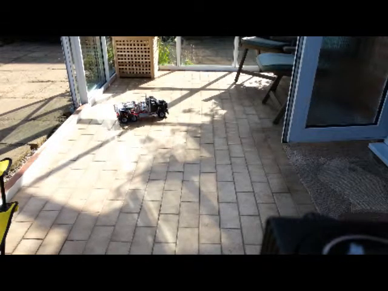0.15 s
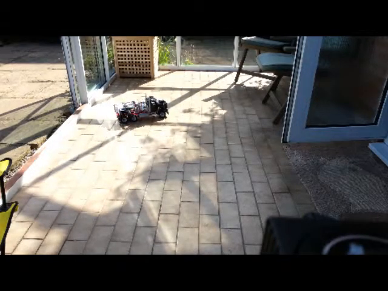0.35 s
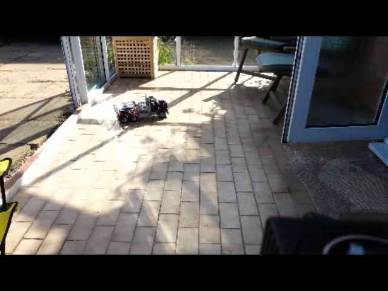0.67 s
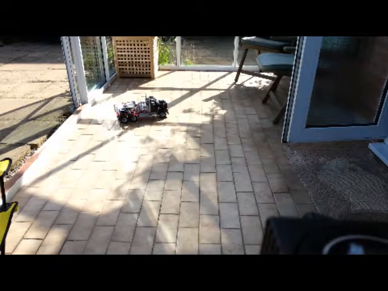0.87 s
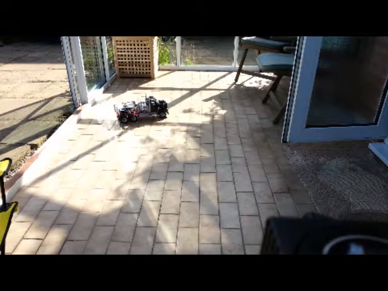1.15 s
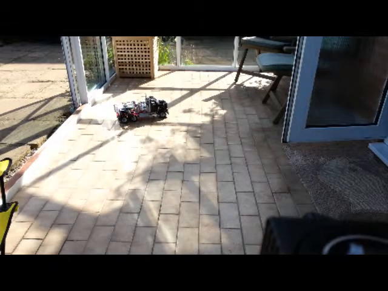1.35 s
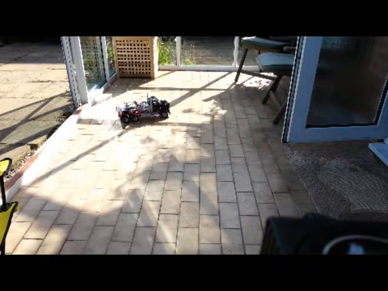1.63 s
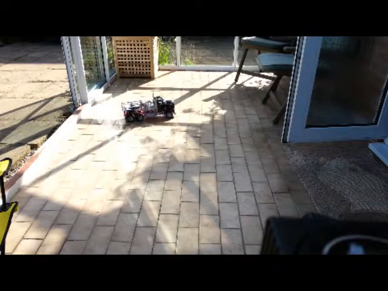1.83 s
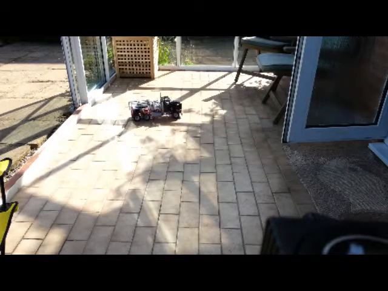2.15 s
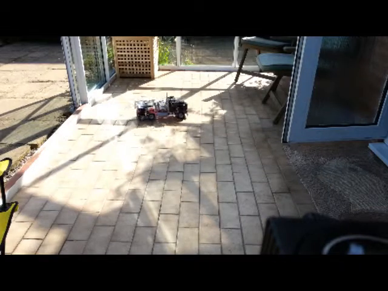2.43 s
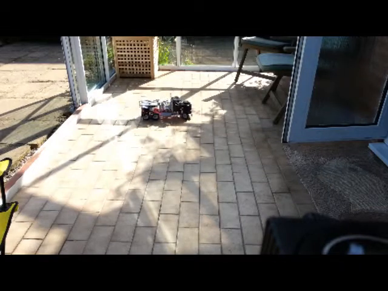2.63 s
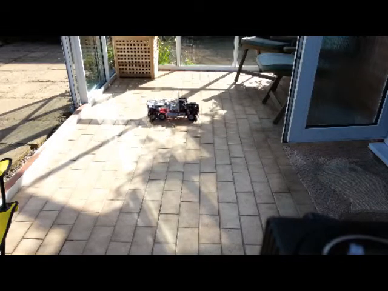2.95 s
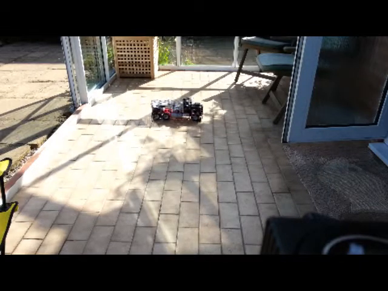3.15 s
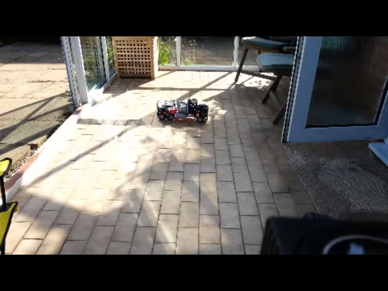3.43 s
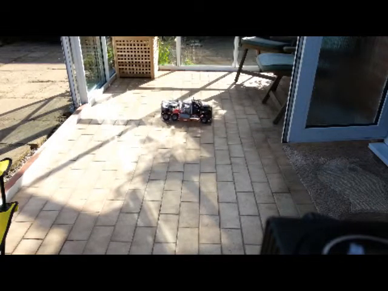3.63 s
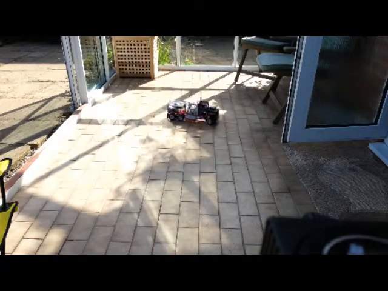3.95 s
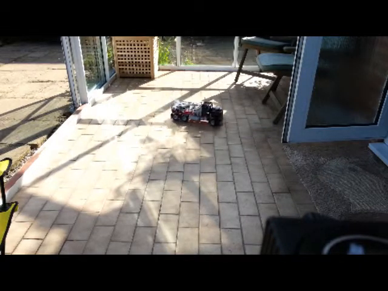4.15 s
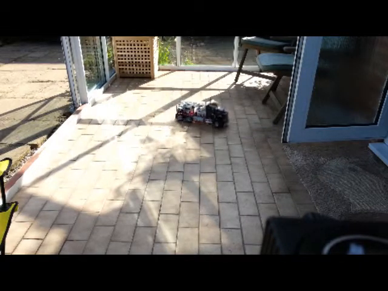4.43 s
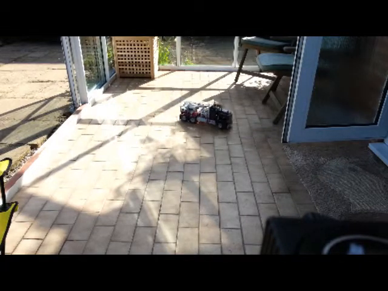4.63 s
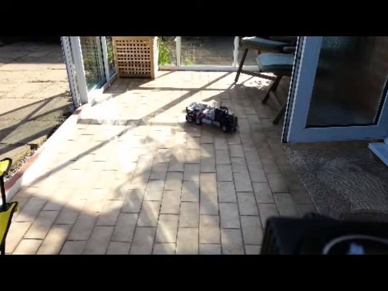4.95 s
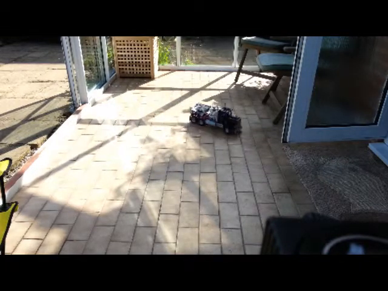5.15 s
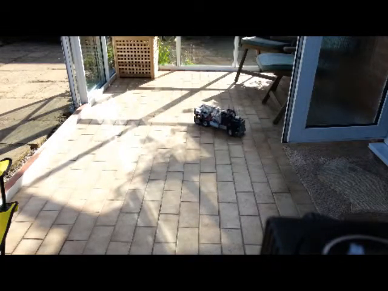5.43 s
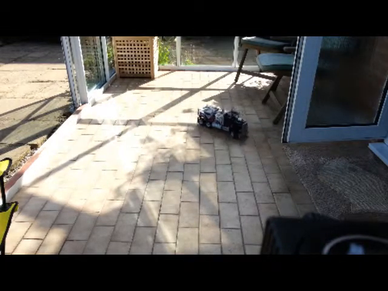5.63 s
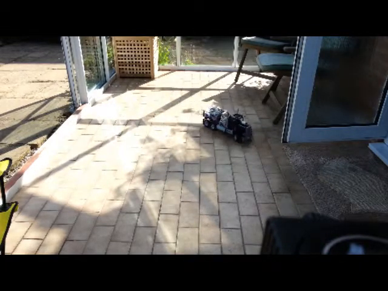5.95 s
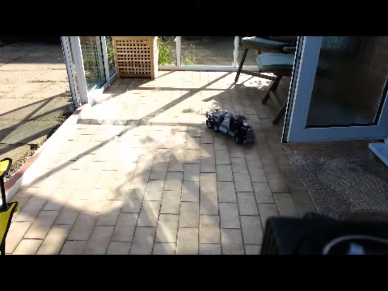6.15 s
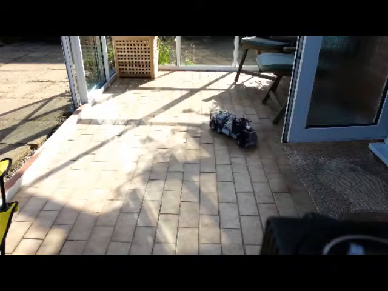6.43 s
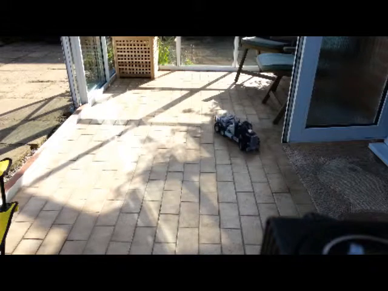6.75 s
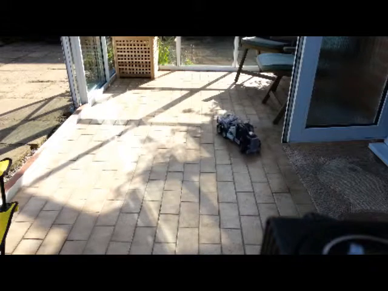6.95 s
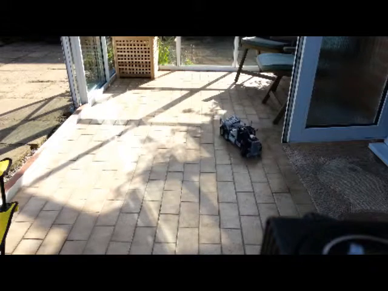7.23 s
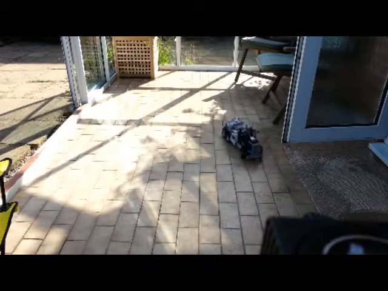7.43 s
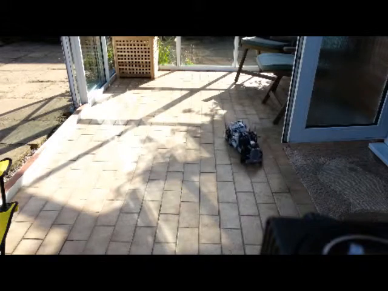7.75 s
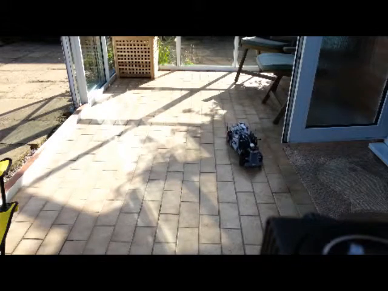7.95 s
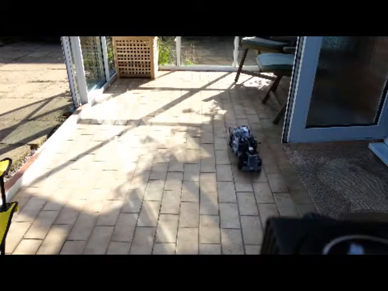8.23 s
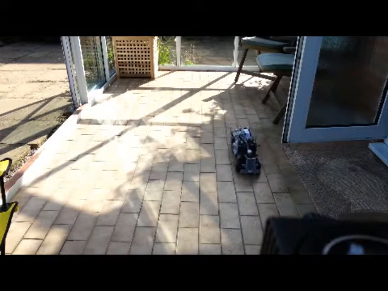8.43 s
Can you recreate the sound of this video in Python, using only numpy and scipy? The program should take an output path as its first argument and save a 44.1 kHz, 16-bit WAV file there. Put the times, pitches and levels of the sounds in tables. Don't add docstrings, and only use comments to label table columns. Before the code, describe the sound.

In a tiled glass porch with open doors, a toy truck's gears stop, leaving birds and wind bumping the microphone. Just after one second its little motor rattles up to speed and runs to the end, a buzzy whine over sizzling plastic gear noise, wavering as wheels cross the joints and strongest late on. Sparrows chirp with short echoes, a far dove is barely audible, and late gusts thump mainly on the right.

```python
import sys
import numpy as np
from scipy import signal
from scipy.fft import irfft
from scipy.io import wavfile

SR = 44100
rng = np.random.default_rng(int(sys.argv[2]) if len(sys.argv) > 2 else 0)


def voltage_ratio(decibels):
    exponent = np.asarray(decibels, float) / 20
    return 10 ** exponent


def output_pcm(signal):
    pcm = np.clip(np.atleast_2d(signal).T, -1, 1) * 32767
    wavfile.write(sys.argv[1], SR, np.round(pcm).astype(np.int16))


N = 378378

# time in seconds, tooth mesh in Hz, main whine in dB, tooth load in dB.
DRIVE = [(1.24, 424.6, -83, -15.5), (1.34, 516, -46, 5), (1.44, 503.3, -44, -3.5), (1.52, 472.8, -48, 3),
         (1.63, 593.7, -40.5, -2.5), (1.77, 650, -64, 7), (1.8, 629.7, -41.5, 3), (4.2, 674.3, -46.5, 4),
         (5.0, 654, -39, 3), (5.8, 627, -43.5, 4.5), (6.6, 643.1, -39, 2), (7.1, 623.8, -42.5, 2),
         (7.9, 623.8, -36.5, 2), (8.08, 619.9, -32.5, -1), (8.2, 626.8, -34, 2.5), (8.58, 625.4, -38, 3.5)]
# middle in seconds, length in seconds, speed lost in %, whine gained in dB.
TILE_JOINTS = [(1.928, 0.31, 6.6, 0.5), (2.284, 0.29, 3.56, 7), (2.753, 0.58, 3.76, 0),
               (3.261, 0.73, 6.14, 2.5), (3.797, 0.71, 9.14, 7.5), (4.305, 0.84, 9.55, 2.5),
               (4.802, 0.43, 6.74, 0), (5.287, 0.56, 8.9, 1.5), (6.351, 0.65, 8.06, 4.5),
               (6.819, 0.49, 4.9, 3.5), (7.196, 0.55, 4.97, 6.5), (7.435, 0.39, 2.42, 0.5),
               (7.745, 0.52, 3.14, 3.5), (8.345, 0.64, 2.6, 3)]
# time in seconds, level in dB.
HISS = [(0.0, -45), (0.13, -54), (0.17, -59), (0.4, -73.5), (1.15, -70.5), (1.24, -59), (1.29, -46.5),
        (1.38, -46), (1.48, -54), (1.6, -40.5), (1.72, -42.5), (2.05, -40), (6.14, -41), (8.58, -41.5)]
# frequency in Hz, density in dB per Hz.
HISS_COLOUR = [(150, -48.5), (250, -10), (501, -11), (1230, -10.5), (1360, -10.5), (1850, -3),
               (2190, -35.5), (2510, -10), (3470, -4.5), (4400, -2), (7690, -11), (10600, -8.5),
               (12000, -14), (13000, -38), (14400, -84)]
# frequency in Hz, width in Hz, level in dB.
CHASSIS = [
    (2610, 690, 5.5),
    (3900, 250, -15),
    (4070, 370, -15),
    (10460, 1300, 8),
]
# multiple of the shaft speed, level in dB rms.
ORDER_LEVELS = [(10, -68.5), (17, -63.5), (20, -53.5), (27, -55), (29, -60), (30, -37.4), (31, -50.5),
                (33, -60), (37, -63.5), (38, -58), (41, -60), (40, -50.5), (42, -57), (43, -48), (44, -79),
                (47, -53), (49, -54.5), (50, -44.5), (52, -49), (53, -69), (54, -55), (60, -44.5),
                (62, -50), (69, -49), (70, -42.5), (72, -53), (74, -50.5), (78, -64), (79, -45.5),
                (90, -55.5)]
# time in seconds, delay of the left port in ms.
LEFT_LAG = [
    (0, 0.43),
    (4, 0.39),
    (6, -0.065),
    (8.58, -0.03),
]
# frequency in Hz, density in dB per Hz.
GARDEN = [(24, -33), (40, -4), (180, -5), (616, -8.5), (807, -11.5), (869, 1), (1650, -24), (3130, -23.5),
          (6550, -18), (9000, -18.5), (12700, -16), (14400, -21.5)]
# frequency in Hz, left-right likeness from 0 to 1.
LIKENESS = [(300, 0.31), (1500, 0.11), (4000, 0.25), (12000, 0.087)]
# frequency in Hz, left over right in dB.
LEAN = [(60, -4.5), (180, 1.5), (530, -0.5), (1580, 0.5), (4690, -5.5), (14000, 1)]
# time in seconds, level in dB.
BREEZE = [(0, -57), (1.1, -56), (1.5, -62), (3.0, -60.5), (3.3, -73.5), (5.2, -78), (5.6, -64),
          (7.3, -62.5), (8.58, -63.5)]
# middle in seconds, length in seconds, level in dB, left over right in dB.
GUSTS = [(0.136, 0.09, -38, 25), (0.209, 0.11, -28, 0.5), (.31, 0.1, -38.5, 4), (0.381, 0.092, -38.5, -12),
         (0.608, 0.2, -53, 20), (0.787, 0.21, -44, -3), (0.84, 0.23, -38.5, 23), (1.728, 0.32, -51.5, 16),
         (2.04, 0.32, -49, 1), (2.27, 0.33, -45.5, 6.5), (2.639, 0.066, -50, -4), (2.86, 0.28, -49, 6),
         (3.9, .1, -48.5, 12), (4.04, 0.12, -62, 22), (4.253, .08, -57, 12), (7.47, .1, -59, -16),
         (7.634, 0.1396, -46.5, 4), (7.739, 0.12, -39.5, -30), (7.813, 0.065, -42.5, -42),
         (7.89, 0.11, -41, 0), (8.006, 0.25, -43, -20), (8.097, 0.12, -32.5, -25.5), (8.181, 0.17, -37, -1),
         (8.401, 0.19, -62.5, 22.5)]
# start in seconds, length in seconds, top in Hz, fall after the top in Hz, level in dB.
CHIRPS = [(0.061, 0.055, 4140, 595, -28.5), (0.102, 0.076, 3100, 320, -34), (0.632, 0.04, 5410, 400, -46),
          (0.644, 0.12, 4550, 1860, -32), (0.825, 0.052, 5460, 910, -46), (0.827, .04, 2800, 463, -39.5),
          (0.853, 0.14, 3900, 1432, -40.5), (1.173, 0.13, 5075, 2606, -35), (1.223, 0.035, 6620, 40, -43),
          (1.228, .04, 6080, 40, -41), (1.392, 0.09, 4340, 1104, -34.5), (2.167, 0.09, 4330, 1150, -35),
          (2.696, 0.11, 4420, 1240, -36), (4.025, 0.086, 4260, 1150, -31.5),
          (4.761, 0.081, 4356, 1100, -33), (5.393, 0.12, 4370, 1500, -39), (5.787, 0.057, 6054, 60, -34),
          (6.148, 0.099, 4532, 1258, -43), (6.966, 0.11, 4803, 1592, -30), (7.729, 0.048, 6065, 442.7, -35),
          (7.789, 0.078, 4166, 1274, -30), (8.207, 0.054, 6100, 145.4, -37)]
# start in seconds, length in seconds, start in Hz, end in Hz, level in dB.
COOS = [
    (3.92, 0.28, 824, 791, -53.5),
    (5.62, 0.34, 557, 452.2, -59),
    (6.36, 0.287, 828.4, 775, -55),
    (7.18, .25, 488.3, 431, -66.5),
]

TEETH, MAIN_ORDER = 10, 30
START_S, SETTLED_S = 1.24, 1.76
TRUCK_T60_S, PORCH_T60_S = 0.33, 0.42
SIDES = np.array([[.5], [-.5]])
SLOW = 40


def rms_one(x):
    return x / np.sqrt(np.mean(x ** 2) + 1e-20)


def in_time(rows):
    s, *columns = np.transpose(rows)
    return [np.interp(np.arange(N) / SR, s, c) for c in columns]


def at_hz(points, hz):
    table_hz, value = np.array(points).T
    return np.interp(np.log(hz), np.log(table_hz), value)


def fill_in(slow):
    return np.interp(np.arange(N) / SLOW, np.arange(len(slow)), slow)


def drift(rate_hz):
    r = np.exp(-2 * np.pi * SLOW * rate_hz / SR)
    white = rng.standard_normal(N // SLOW + 2002)
    slow = signal.lfilter([1], [1, -2 * r, r * r], white)[2000:]
    return fill_in(rms_one(slow))


def humps(rows):
    t = np.arange(0, N, SLOW) / SR
    middle, length = np.transpose(rows)[:2, :, None]
    return np.cos(np.pi * np.clip((t - middle) / length, -.5, .5)) ** 2


def bandpass(x, low_hz, high_hz):
    return signal.sosfilt(signal.butter(2, [low_hz, high_hz], "band", fs=SR, output="sos"), x)


def resonance(x, hz, width_hz):
    r = np.exp(-np.pi * width_hz / SR)
    poles = [1, -2 * r * np.cos(2 * np.pi * hz / SR), r * r]
    return signal.lfilter([(1 - r * r) / 2, 0, (r * r - 1) / 2], poles, x)


def banded_noise(spectrum, patchy_db, tilt_db):
    out = 0
    edges = 45 * 2 ** np.arange(0, 8.5, .4)
    white = rng.standard_normal((2, 2, N))
    for k, (low, high) in enumerate(zip(edges, edges[1:])):
        mid, side = bandpass(white[k % 2], low, high)
        hz = np.sqrt(low * high)
        alike = np.clip(at_hz(LIKENESS, hz), 0, 1)
        tilt = tilt_db * np.log2(hz / 9000) / 2
        gain = voltage_ratio(at_hz(spectrum, hz) + patchy_db * drift(5.7) + tilt)
        lean = voltage_ratio(at_hz(LEAN, hz) * SIDES)
        out = out + gain * lean * (np.sqrt(1 + alike) * mid + np.sqrt(1 - alike) * side * 2 * SIDES)
    return out


def porch(x, t60_s):
    t = np.arange(SR) / SR
    tail = rng.standard_normal((2, SR)) * voltage_ratio(-60 * t / t60_s) * (t > .004)
    return signal.fftconvolve(x, tail / np.sqrt(np.sum(tail[0] ** 2)), axes=1)[:, :N]


def at_ports(x):
    lag_ms, = in_time(LEFT_LAG)
    left = np.interp(np.arange(N) - lag_ms * SR / 1000, np.arange(N), x[0])
    return np.array([left, x[1]])


def drive():
    mesh_hz, main_db, load_db = in_time(DRIVE)
    lost, gained_db = np.transpose(TILE_JOINTS)[2:] @ humps(TILE_JOINTS)
    turns = np.cumsum(mesh_hz * (1 - fill_in(lost) / 100)) / SR / TEETH
    main_db = main_db + fill_in(gained_db) + 2 * drift(5.5)
    pan_db = -3.0 + 5 * drift(5.0)
    return main_db, pan_db, load_db + 0.38 * drift(13.0), turns


def gear_hiss(turns):
    hiss_db, = in_time(HISS)
    running_db = -39.5
    bright_db = 1.45 + 0.4244 * (hiss_db - running_db)
    noise = banded_noise(HISS_COLOUR, patchy_db=0.44, tilt_db=bright_db)
    noise = noise + sum(voltage_ratio(db) * resonance(noise, hz, width) for hz, width, db in CHASSIS)
    beat = 1 + 0.27 * np.cos(2 * np.pi * TEETH * turns) + 0.099 * np.cos(2 * np.pi * turns)
    treble = bandpass(noise, 6500, 12000)
    direct = voltage_ratio(hiss_db + 0.67) * beat * noise / np.std(treble)
    return at_ports(direct) + voltage_ratio(-3.0) * porch(direct, TRUCK_T60_S)


def garden():
    return voltage_ratio(-56.5) * rms_one(banded_noise(GARDEN, patchy_db=1.2, tilt_db=0))


def gust_strength():
    level_db, pan_db = np.transpose(GUSTS)[2:]
    gusts = voltage_ratio(level_db + pan_db * SIDES) @ humps(GUSTS)
    return voltage_ratio(in_time(BREEZE)[0]) + np.array([fill_in(port) for port in gusts])


def wind():
    eddies_per_s = 160
    sizes_db = 4.5 * np.minimum(rng.exponential(1, (2, N)), 4)
    sizes = voltage_ratio(sizes_db) * rng.choice([-1, 1], (2, N))
    eddies = sizes * (rng.random((2, N)) < eddies_per_s / SR) + 1e-18
    thumps = bandpass(eddies, 75, 230)
    thumps = signal.sosfilt(signal.butter(2, 380, fs=SR, output="sos"), thumps)
    return voltage_ratio(-7.5) * gust_strength() * rms_one(thumps)


def sparrows():
    out = np.zeros((2, N))
    for s, length, top_hz, fall_hz, level_db in CHIRPS:
        start_hz, end_hz = top_hz - .55 * fall_hz, top_hz - fall_hz
        u = np.linspace(0, 1, int(length * SR))
        glide = np.interp(u, [0, .3, 1], [start_hz, top_hz, end_hz])
        trill = np.sin(2 * np.pi * 130 * length * u + 1.5 * u ** 2)
        pitch_hz = glide + 0.21 * (top_hz - end_hz + 300) * trill
        tone = np.sin(2 * np.pi * np.cumsum(pitch_hz) / SR)
        shape = np.sin(np.pi * u ** 0.66) * (1 + 0.027 * trill)
        at = int(s * SR)
        out[:, at:at + len(u)] += voltage_ratio(level_db) * tone * shape
    return voltage_ratio(-11.0) * at_ports(out) + voltage_ratio(2.5) * porch(out, PORCH_T60_S)


def tick():
    after = np.arange(N) / SR - .169
    decay = voltage_ratio(-36 - 60 * np.abs(after) / 0.016)
    click = bandpass(rng.standard_normal(N) * decay * (after > 0), 5500, 12000)
    return at_ports([click, click])


def order_amplitudes():
    levels = np.zeros(2049)
    faint = np.arange(8, 130)
    levels[faint] = voltage_ratio(at_hz(HISS_COLOUR, faint * 62) - 54.5 + 2.3 * np.log2(faint / 50))
    for order, level_db in ORDER_LEVELS:
        levels[order] = voltage_ratio(level_db) * (order != MAIN_ORDER)
    return levels


def whine(main_db, pan_db, load_db, turns):
    t = np.arange(N) / SR
    running = t > START_S
    backlash = .002 + .014 * (t < SETTLED_S)
    turns = turns + backlash * drift(35)
    levels = order_amplitudes()
    points = 4096
    place = (turns * points).astype(int) % points
    rest = 0
    for share in range(5):
        dealt = levels * (np.arange(2049) * 7 // 10 % 5 == share)
        one_turn = irfft(dealt * np.exp(2j * np.pi * rng.random(2049))) * points / np.sqrt(2)
        rest = rest + voltage_ratio(2.2 * drift(6)) * one_turn[place]
    rest = rest * voltage_ratio(load_db) * running * voltage_ratio(-2.0 * SIDES)
    rest = rest + voltage_ratio(0.5) * resonance(rest, 4082, 82)
    wander = 1.54 * np.array([drift(3.47), drift(3.14)])
    main_gain = np.sqrt(2) * voltage_ratio(main_db + pan_db * SIDES + 2.0 * drift(21))
    main = main_gain * np.sin(2 * np.pi * MAIN_ORDER * turns + wander) * running
    echoes = porch(voltage_ratio(-3.5) * rest + voltage_ratio(-6) * main, TRUCK_T60_S)
    return main + voltage_ratio(-12.0) * at_ports(rest) + echoes


def dove():
    out = np.zeros((2, N))
    for s, length, start_hz, end_hz, level_db in COOS:
        u = np.linspace(0, 1, int(length * SR))
        pitch_hz = start_hz + (end_hz - start_hz) * u ** 1.2
        tone = np.sin(2 * np.pi * np.cumsum(pitch_hz) / SR)
        at = int(s * SR)
        out[:, at:at + len(u)] += voltage_ratio(level_db) * tone * np.sin(np.pi * u ** 0.43)
    return voltage_ratio(-2.5) * out + voltage_ratio(10.0) * porch(out, PORCH_T60_S)


def scene():
    main_db, pan_db, load_db, turns = drive()
    truck = gear_hiss(turns) + tick() + whine(main_db, pan_db, load_db, turns)
    return truck + garden() + wind() + sparrows() + dove()


def band_limit(x):
    return signal.sosfilt(signal.butter(12, 14560, fs=SR, output="sos"), x)


def record(dry):
    return band_limit(dry)


dry = scene()
out = record(dry)
output_pcm(out)
```